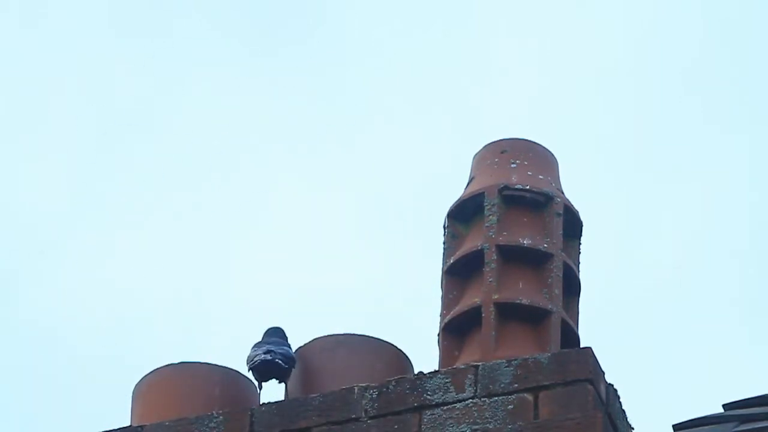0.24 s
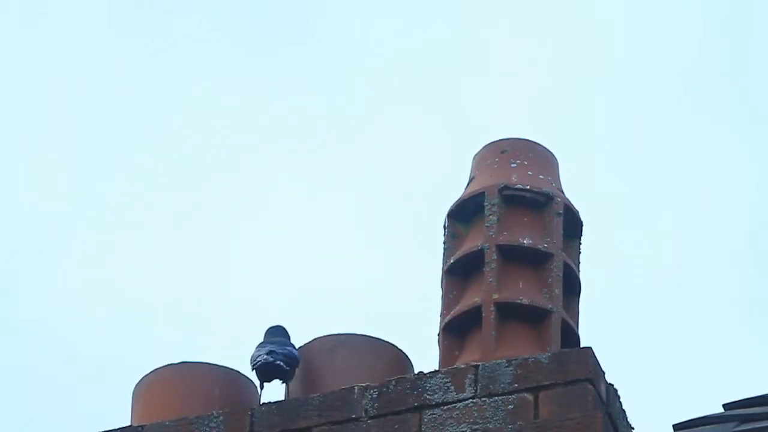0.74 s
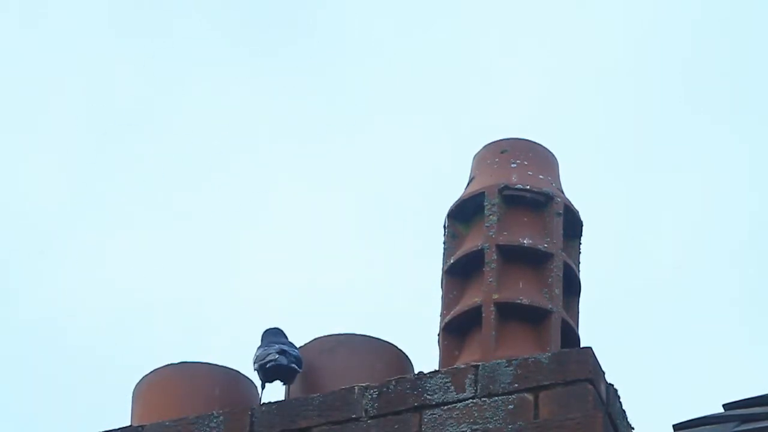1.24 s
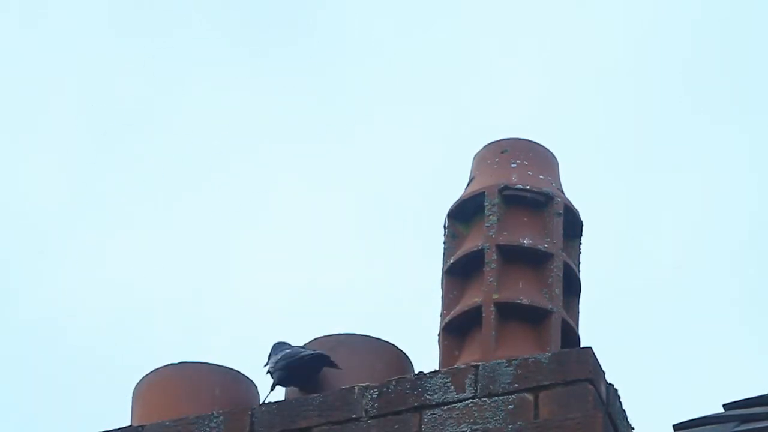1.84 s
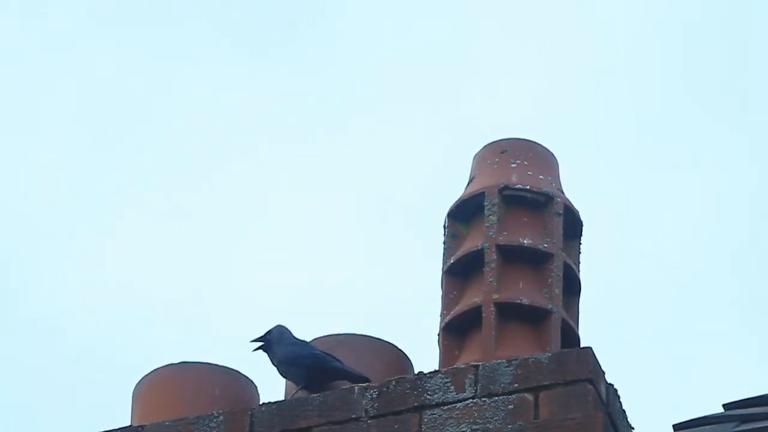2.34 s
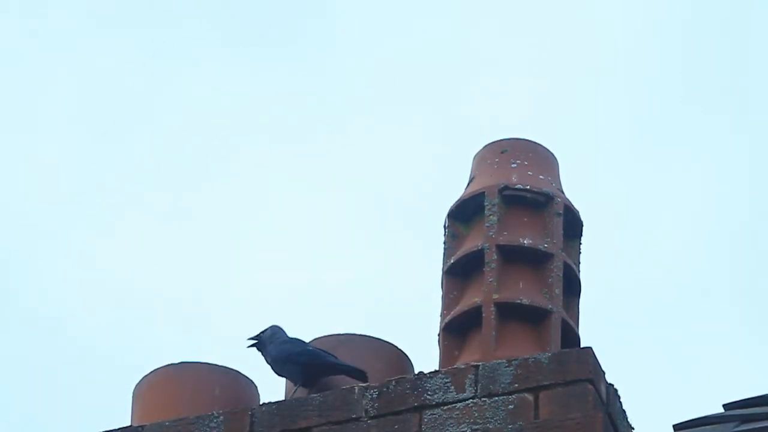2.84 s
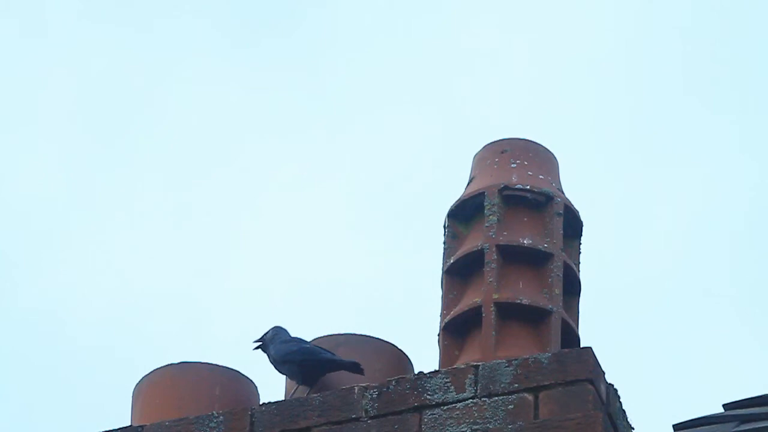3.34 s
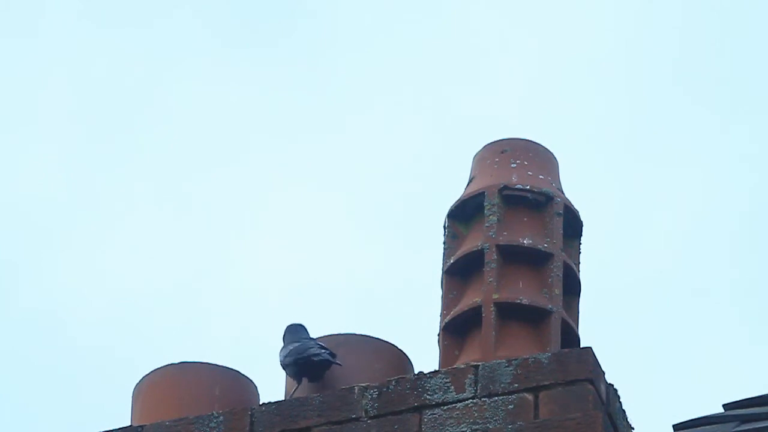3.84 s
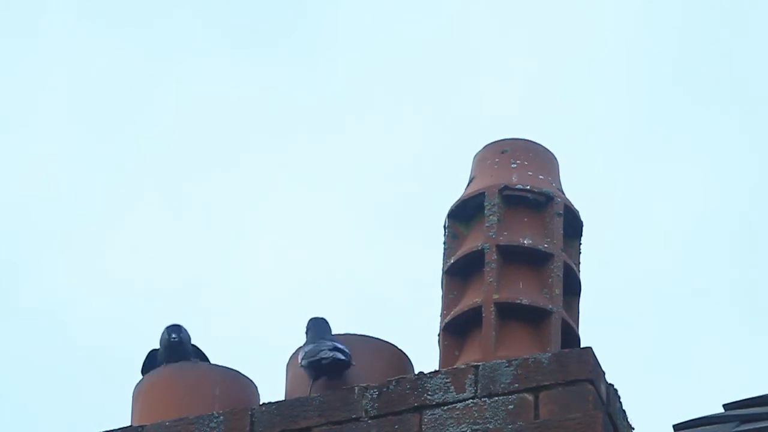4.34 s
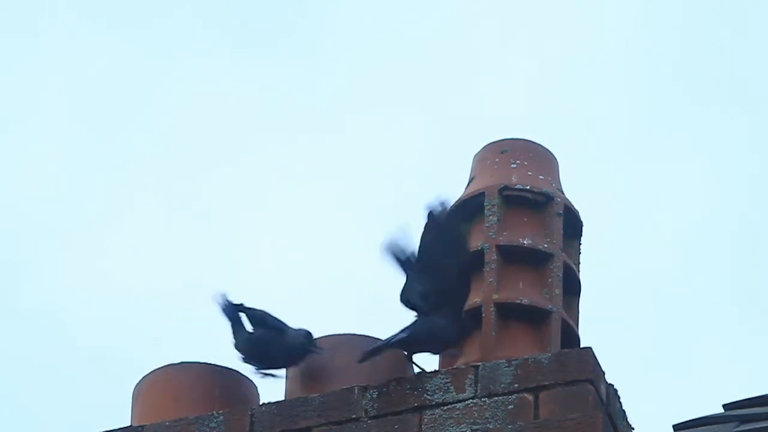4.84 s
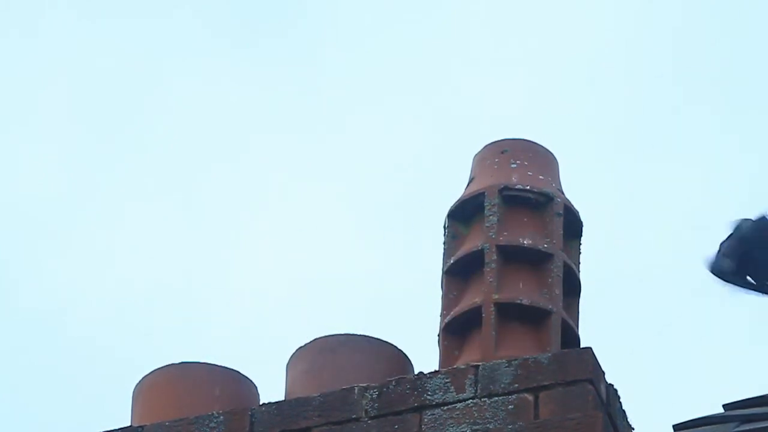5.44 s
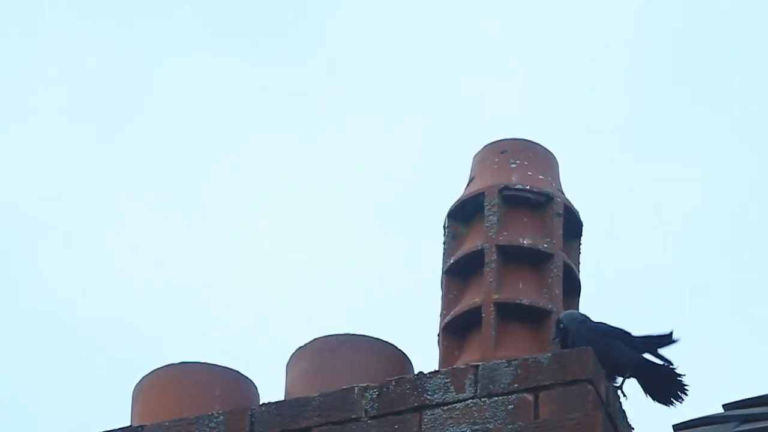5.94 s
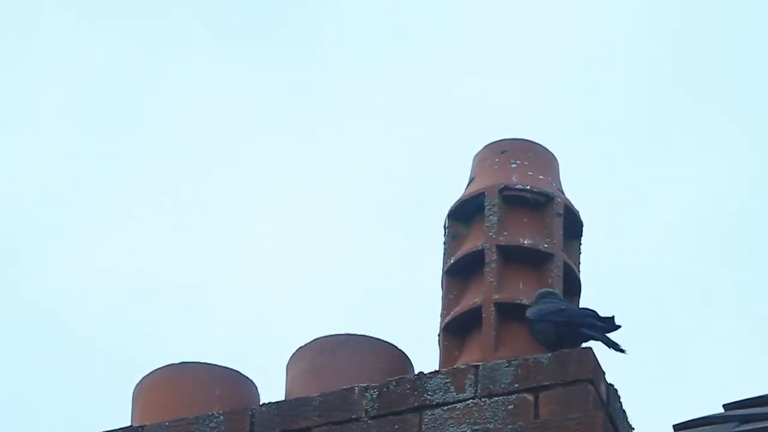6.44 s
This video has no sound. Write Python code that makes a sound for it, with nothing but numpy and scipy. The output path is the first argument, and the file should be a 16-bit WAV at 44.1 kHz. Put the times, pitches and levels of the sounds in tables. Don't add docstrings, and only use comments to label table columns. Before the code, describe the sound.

A rooftop outdoors, with low, steady town hum throughout. From the start a distant jackdaw colony chatters, whistles and rasps, and an arched, rough call sounds at 0.15 s. A sharp clear cry breaking into a harsh falling tail comes at 0.6 s, a dull low thump at 0.83 s amid overlapping hoarse voices, another arched call at 1.0 s and a loud longer cry at 1.4 s. The colony fades by 2 s. Single calls follow at 2.75 s and around 3.0 to 3.25 s, with weaker ones near 3.6 s, each with a short diffuse wall echo. A very faint motor passes around 4 s. The loudest cry is at 4.45 s, then faint small-bird churrs. Wings stir at 4.9 s, clap rapidly and crisply from 5.1 to 5.35 s, beat again near 5.6 s and flutter softly to 6 s beside a thin faint pipe. A duller call comes at 6.5 s.

```python
import sys
import numpy as np
from scipy import signal
from scipy.fft import rfft, irfft
from scipy.io import wavfile
from scipy.ndimage import uniform_filter1d

SR = 44100
rng = np.random.default_rng(int(sys.argv[2]) if len(sys.argv) > 2 else 0)


def attenuation_scalar(level_db):
    decades = np.asarray(level_db, float) / 20
    return 10 ** decades


def transcribe(signal):
    frames = np.atleast_2d(signal).T
    limited = np.clip(frames, -1, 1)
    pcm = np.round(limited * 32767).astype(np.int16)
    wavfile.write(sys.argv[1], SR, pcm)


N = 294588

# (time [s], level [dB])
COLONY_LEVEL = [
    (0, -40),
    (.4, -46),
    (1, -43.5),
    (1.4, -46),
    (1.7, -56.5),
    (2.1, -67),
    (6.68, -62.5),
]
RASP_SHARE = .1


def rms_one(x):
    return x / np.sqrt(np.mean(x ** 2) + 1e-20)


def at_hz(points, hz):
    points = np.array(points)
    return np.interp(np.log(hz), np.log(points[:, 0]), points[:, 1])


def in_time(rows):
    s, level_db = np.transpose(rows)
    return np.interp(np.arange(N) / SR, s, level_db, left=-120, right=-120)


def wobble(size, hz):
    knots = rng.standard_normal(size // 8 + 2)
    places = np.arange(size) * min(2 * hz / SR, 1 / 8)
    return np.interp(places, np.arange(len(knots)), knots) * 1.22


def coloured(x, spectrum):
    hz = np.maximum(np.fft.rfftfreq(x.shape[-1], 1 / SR), 1)
    return irfft(rfft(x) * attenuation_scalar(at_hz(spectrum, hz)), x.shape[-1])


def add(out, s, piece):
    i = int(s * SR)
    out[i:i + len(piece)] += piece[:N - i]


def glide(length, places, pitches_hz):
    size = 2 * int(length * SR / 2)
    path = np.interp(np.arange(size) / size, places, pitches_hz)
    return uniform_filter1d(path, size // 6, mode="nearest")


def note(hz, throat, rough, rise, fall, upper_db=0, swell_db=0, half_db=0, dull_db=0, closing=0):
    size = len(hz)
    t, part = np.arange(size) / SR, np.arange(size) / size
    shake = np.clip(rough * (.3 + 1.2 * part), 0, .6)
    hz = hz * (1 + 0.0887 * shake * wobble(size, hz=260.2))
    phase = 2 * np.pi * np.cumsum(hz) / SR
    k = np.arange(1, 36)[:, None]
    partial_hz = k * hz
    upper = upper_db * np.exp(-(np.log(partial_hz / 5300) / 0.22) ** 2)
    halves = half_db * (k % 2) * np.clip(1 - 1.85 * part, 0, 1)
    patches = 11 * shake * np.array([wobble(size, hz=60) for _ in k])
    muffling = dull_db * np.clip(np.log2(partial_hz / 5600), 0, 1)
    resonance = at_hz(throat, partial_hz * (1 + closing * part))
    weights = attenuation_scalar(resonance + upper + halves + patches - muffling) * (partial_hz < 16000)
    tone = (weights * np.cos(k * phase + rng.uniform(0, 3.6, k.shape))).sum(axis=0)
    tone = tone / np.sqrt((weights ** 2).sum(axis=0) / 2)
    gate = (.5 + .5 * np.cos(phase)) ** 0.33
    breath = rms_one(coloured(gate * rng.standard_normal(size), throat))
    uneven = attenuation_scalar(5.72 * shake * wobble(size, hz=188.3))
    edges = np.clip(t / rise, 0, 1) * np.clip((size / SR - t) / fall, 0, 1)
    shape = edges * attenuation_scalar(swell_db * part)
    return shape * uneven * (np.sqrt(1 - shake) * tone + np.sqrt(shake) * breath)


def strand(length, first_hz, last_hz, hoarse_hz):
    size = int(length * SR)
    phase = 2 * np.pi * np.cumsum(np.linspace(first_hz, last_hz, size)) / SR
    steady = 60.0 / hoarse_hz
    flutter = attenuation_scalar(min(hoarse_hz / 20, 2.5) * wobble(size, hz=43.6))
    in_phase = (steady + wobble(size, hoarse_hz)) * np.sin(phase)
    quadrature = wobble(size, hoarse_hz) * np.cos(phase)
    return rms_one(flutter * (in_phase + quadrature))


def town():
    # (frequency [Hz], density [dB per Hz])
    traffic = [(15, -66), (25, -13.5), (75, -14), (113, -11.5), (173, -10.5), (340, -4), (389, -4.5),
               (722, -10), (1660, -12.5), (2010, -19), (6210, -25), (7100, -25.5), (15500, -30)]
    # (frequency [Hz], bandwidth [Hz], level [dB])
    drones = [(110.4, 19, -67.5)]
    noise = rng.standard_normal((2, N))
    side = coloured(noise[1], [(60, -10), (300, -13), (2000, -12), (14000, -9)])
    stereo = coloured(noise[0] + side * [[1], [-1]], traffic)
    out = attenuation_scalar(-51 + wobble(N, hz=2.17) / 2) * rms_one(stereo)
    for hz, width_hz, level_db in drones:
        phase = 2 * np.pi * hz * np.arange(N) / SR
        in_phase = wobble(N, width_hz / 2) * np.sin(phase)
        out = out + attenuation_scalar(level_db) * (in_phase + wobble(N, width_hz / 2) * np.cos(phase))
    return out


def murmur():
    spectrum = [(500, -21), (1300, -9.5), (2300, -0.5), (3500, -17.5), (4500, -13.0), (5600, -14), (9000, -26.5)]
    voices = rms_one(coloured(rng.standard_normal(N), spectrum))
    return attenuation_scalar(in_time(COLONY_LEVEL) - 1.5 + 4.2 * wobble(N, hz=7.7)) * voices


def heads():
    # (time [s], length [s], first pitch [Hz], last pitch [Hz], level [dB])
    calls = [(0.038, 0.032, 1314, 1040, -33.5), (0.619, 0.033, 1390, 1273, -22.5),
             (0.845, 0.036, 1270, 1100, -31.5), (1.236, 0.0399, 1368, 1113, -34),
             (1.424, 0.0299, 1387, 1281, -19), (2.757, 0.029, 1394, 1288, -21.5),
             (3.032, 0.036, 1430, 1043, -34), (3.57, 0.0517, 1247, 948, -38.5),
             (3.719, 0.023, 1305, 1206, -34), (4.456, 0.027, 1387, 1286, -16.5),
             (6.488, 0.02, 1295, 1487, -24.5), (6.663, 0.027, 1085, 1060, -40.5)]
    # (frequency [Hz], level [dB])
    throat = [(500, -21), (1300, -9), (2700, 2), (4000, -19.5), (5400, -15), (6800, -16), (10000, -12.5),
              (15000, -17)]
    notes = []
    for s, length, first_hz, last_hz, level_db in calls:
        far_db, sag = max(-29.5 - level_db, 0), 1 - last_hz / first_hz
        gape_db = np.clip(133.5 * (sag - 0.082), -5, 13.5)
        hz = glide(length, [0, .2, 1], [1.1 * first_hz, .85 * first_hz + .15 * last_hz, last_hz])
        piece = note(hz, throat, rough=.025 * (0.5 + 0.8 * far_db),
                     rise=0.0097 - 0.015 * max(sag - .1, 0), fall=0.0015 + 0.0021 * far_db,
                     upper_db=gape_db, swell_db=5.5 - 36.5 * abs(sag),
                     dull_db=15 + far_db + 10 * (sag < 0))
        notes.append((s, level_db, -8, piece))
    return notes


def rasps():
    # (time [s], length [s], pitch [Hz], level [dB])
    calls = [(0.049, 0.084, 5090, -48), (.42, 0.12, 2540, -47), (0.501, 0.108, 3395, -43.5),
             (0.933, 0.16, 3186, -37.5), (1.083, 0.071, 3320, -33), (1.255, 0.077, 3486, -44),
             (1.354, 0.06, 3490, -40.5), (1.775, 0.18, 2600, -55), (2.312, .063, 4470, -61),
             (3.071, 0.1206, 1880, -42), (4.30, 0.33, 7050, -62), (4.312, 0.064, 3130, -60.5)]
    return [(s, length, hz, hz, level_db, RASP_SHARE * hz) for s, length, hz, level_db in calls]


def slurs():
    # (time [s], length [s], first pitch [Hz], last pitch [Hz], level [dB])
    calls = [
        (0.097, 0.052, 1075, 925, -53),
        (0.387, 0.086, 1297, 993, -43),
        (0.449, 0.134, 1930, 1565, -43),
        (0.853, .12, 1500, 1303, -48.5),
        (0.901, 0.14, 2080, 1627, -44.5),
        (4.443, 0.015, 1550, 1270, -51),
    ]
    # (frequency [Hz], level [dB])
    throat = [(1000, -7), (1700, -1.5), (2300, 1.5), (3500, -6), (5000, -8.5), (8000, -33.5)]
    rows = []
    for s, length, first_hz, last_hz, level_db in calls:
        for k in range(1, 5):
            throat_db = at_hz(throat, k * (first_hz + last_hz) / 2)
            rows.append((s, length, k * first_hz, k * last_hz, level_db + throat_db, k * 40))
    return rows


def arches():
    # (time [s], top pitch [Hz], last pitch [Hz], level [dB])
    calls = [
        (.157, 641.6, 415.3, -22.5),
        (0.994, 654, 443, -23),
        (3.231, 661.4, 393.7, -27),
    ]
    # (frequency [Hz], level [dB])
    throat = [(500, -28), (1250, -11), (1800, -5.5), (2500, 6), (3100, -11.5), (4000, -24), (5600, -7.5),
              (7500, -19), (11000, -20.5), (15000, -18.5)]
    notes = []
    for s, top_hz, last_hz, level_db in calls:
        hz = glide(.078, [0, .2, .4, 1], [.89 * top_hz, top_hz, .94 * top_hz, last_hz])
        piece = note(hz, throat, rough=.10, rise=.010, fall=0.014, swell_db=-3.0, half_db=-14.5)
        notes.append((s, level_db, .1, piece))
    return notes


def whistles():
    # (time [s], length [s], first pitch [Hz], last pitch
    # [Hz], level [dB])
    glides = [(0.302, 0.11, 2310, 2294, -39.5), (0.446, 0.074, 1960, 2400, -35),
              (0.505, 0.0258, 2321, 2399, -28.5), (0.534, 0.079, 2420, 2400, -38.5),
              (0.765, 0.097, 2960, 2950, -41), (0.807, 0.13, 2350, 2286, -38.5),
              (0.901, 0.1057, 2300, 2324, -32.5), (1.179, .12, 2050, 2350, -41),
              (1.618, 0.045, 3750, 3460, -47.5), (1.709, 0.0316, 2700, 2824, -48.5),
              (1.966, 0.064, 2250, 2208, -57), (2.71, 0.097, 4900, 4350, -56),
              (3.084, 0.064, 4750, 4720, -50.5), (3.746, 0.05, 1764, 1370, -38.5),
              (.235, .04, 4930, 3500, -51.5), (.86, .04, 2373, 1938, -39), (4.404, 0.0495, 7300, 6630, -56),
              (5.86, 0.052, 5000, 5100, -53), (6.14, 0.083, 4150, 4100, -60)]
    # (time [s], length [s], level [dB])
    piping = [
        (5.70, .2, -55),
        (5.79, .11, -54),
        (5.90, .30, -60),
    ]
    rows = [(*row, 28) for row in glides]
    return rows + [(s, length, 2022, 2022, level_db, 8) for s, length, level_db in piping]


def chance_calls():
    colony_db = in_time(COLONY_LEVEL)
    rows = []
    for when, long, fall, height in rng.random((44, 4)):
        s, hz = .25 + 1.45 * when, 1300 * 2.8 ** height
        level_db = colony_db[int(s * SR)] - 3
        rows.append((s, .04 + .09 * long, hz, hz * (.95 - .2 * fall), level_db, 60))
    return rows


def churrs():
    # (time [s], length [s], level [dB])
    calls = [
        (0.286, .14, -50),
        (4.636, 0.148, -54),
        (4.817, 0.14, -49.5),
    ]
    # (frequency [Hz], level [dB])
    partials = [(5804, -2.5), (5310, -0.5), (4380, -16.5), (3774, -11.5), (3000, -13)]
    return [(s, length, 1.01 * hz, .99 * hz, level_db + partial_db, 190)
            for s, length, level_db in calls for hz, partial_db in partials]


def engine():
    # time [s], length [s], first frequency [Hz], last frequency [Hz], level [dB]
    motor = (3.72, 0.51, 156, 180, -60.5)
    return [(*motor, 4)]


def yard():
    # (frequency [Hz], level [dB])
    bands = [(1640, -48), (2520, -53.5), (4950, -55.5)]
    start_s, t60_s = 3.78, 1.35
    out, t = np.zeros(N), np.arange(SR // 2) / SR
    for hz, level_db in bands:
        decay = attenuation_scalar(level_db - 60 * t / t60_s) * np.clip(t / 0.027, 0, 1)
        add(out, start_s, decay * strand(.5, hz, hz, RASP_SHARE * hz))
    return out


def far_sources():
    out = murmur() + yard()
    partials = rasps() + slurs() + whistles() + chance_calls() + churrs() + engine()
    for s, length, first_hz, last_hz, level_db, hoarse_hz in partials:
        tone = strand(length, first_hz, last_hz, hoarse_hz)
        add(out, s, attenuation_scalar(level_db) * tone * np.sqrt(np.hanning(len(tone))))
    return out


def tails():
    # (time [s], length [s], last pitch [Hz], level [dB])
    calls = [
        (0.651, 0.064, 442.6, -21),
        (0.878, 0.0321, 600, -36),
        (1.262, 0.044, 444.3, -38),
        (1.454, 0.071, 540, -20.5),
        (2.784, 0.071, 394.4, -21),
        (3.055, 0.0495, 600, -36.5),
        (3.732, 0.058, 625, -41.5),
        (4.482, 0.069, 464, -20.5),
        (6.502, 0.092, 480, -27.5),
    ]
    # (frequency [Hz], level [dB])
    throat = [(400, -45), (950, -13), (1480, -6), (2700, 4.5), (4000, -16), (5700, -7.5), (7500, -13),
              (11000, -20.5), (15000, -20)]
    first_hz, full_s = 999.4, .065
    notes = []
    for s, length, last_hz, level_db in calls:
        plunge = glide(length, [0, .013 / length, .034 / length, 1], [0.935, .84, .27, 0.0093])
        hz = last_hz + (first_hz - last_hz) * plunge
        rough = 0.314 + 20 * max(full_s - length, 0)
        dull_db = 280 * max(length - full_s, 0)
        piece = note(hz, throat, rough, rise=0.0054, fall=0.033, swell_db=-4.5, dull_db=dull_db, closing=0.18)
        notes.append((s, level_db, 1.5, piece))
    return notes


def jackdaws():
    direct, to_walls = np.zeros((2, N))
    for s, level_db, send_db, piece in heads() + arches() + tails():
        far_send_db = 0.549 * max(-18.5 - level_db, 0)
        add(direct, s, attenuation_scalar(level_db) * piece)
        add(to_walls, s, attenuation_scalar(level_db + send_db + far_send_db) * piece)
    return direct, to_walls


def walls(x):
    # (frequency [Hz], decay time t60 [s], level [dB])
    bands = [(600, 0.26, -19), (1100, 0.5, -10.5), (1489, 0.35, -3.5), (2150, 0.47, -4.5), (3230, 0.46, -7),
             (4380, 0.38, -9.5), (6030, 0.39, -7.5), (8600, 0.32, -9)]
    t = np.arange(SR) / SR
    mid, side = rng.standard_normal((2, SR))
    scatter = mid + .25 * side * [[1], [-1]]
    answer = 0
    for hz, t60, level_db in bands:
        sos = signal.butter(2, [hz / 1.333, hz * 1.23], "band", fs=SR, output="sos")
        decay = attenuation_scalar(-60 * t / t60) * np.clip((t - .006) / 0.0052, 0, 1)
        gain = attenuation_scalar(level_db) / np.sqrt(np.sum(decay ** 2))
        answer = answer + gain * signal.sosfilt(sos, scatter) * decay
    return signal.fftconvolve(x[None], answer, axes=1)[:, :N]


def thump():
    # (time [s], frequency [Hz], level [dB], decay time t60 [s])
    modes = [
        (0.828, 108, -46, 0.37),
        (.829, 240, -36, 0.037),
        (0.851, 488.2, -38, 0.194),
    ]
    out, t = np.zeros(N), np.arange(SR // 4) / SR
    for s, hz, level_db, t60 in modes:
        decay = attenuation_scalar(level_db - 60 * t / t60) * np.clip(t / 0.0023, 0, 1)
        add(out, s, decay * np.sin(2 * np.pi * hz * t))
    return out


def wings():
    # (time [s], peak [dB], low band against the peak [dB])
    claps = [(5.01, -38, -19), (5.116, -25, -15), (5.1445, -26.5, -18), (5.1615, -23, -4.5),
             (5.167, -23.5, -13), (5.27, -22.5, -18), (5.2834, -44, -4), (5.332, -34, -8.5),
             (5.3509, -36, -6), (5.4999, -38, -14), (5.6261, -27, -15)]
    # (time [s], peak [dB], width [s])
    strokes = [(2.325, -45, 0.019), (4.86, -38, 0.0192), (4.895, -38, 0.0147), (4.97, -44.5, 0.0074),
               (5.07, -39, 0.0066), (5.18, -50.5, 0.0097), (5.38, -43, 0.0092), (5.46, -43, .008),
               (5.54, -50.5, .008), (5.59, -43.5, 0.021), (5.70, -50, 0.021), (5.75, -48.5, 0.013),
               (5.90, -38.5, 0.0214), (5.964, -39.5, 0.0126)]
    # (time [s], level [dB])
    rustle = [
        (4.75, -75),
        (4.93, -63.5),
        (5.242, -49.5),
        (5.592, -59.5),
        (5.708, -62.5),
        (6.1, -73),
    ]
    bright, low = np.zeros((2, N))
    t = np.arange(SR // 16) / SR
    beats = [(*clap, .0025) for clap in claps]
    beats += [(s, peak_db, -11.5, width) for s, peak_db, width in strokes]
    for s, peak_db, low_db, width in beats:
        bell = np.exp(-((t - 1.22 * width) / width) ** 2)
        burst = bell + 0.29 * np.clip(t / width - 1, 0, 1) * np.exp(-t / 0.036)
        add(bright, s - width, attenuation_scalar(peak_db - 12.0) * burst)
        add(low, s - 0.78 * width, attenuation_scalar(peak_db + low_db - 8) * burst)
    bright = bright + attenuation_scalar(in_time(rustle) - 1.5 + 3.0 * wobble(N, hz=45))
    air = rng.standard_normal((3, N))
    hiss = coloured(air[0] + .35 * air[1] * [[1], [-1]],
                    [(3000, -5.5), (7000, -5), (11500, 1.0), (14500, -1.0), (16000, -1.0)])
    slap = coloured(air[2], [(150, -5), (400, 2.5), (1200, -8), (2000, -8.0), (4500, -2), (7000, -13), (10000, -20)])
    return bright * rms_one(hiss) + low * rms_one(slap)


def scene():
    near, to_walls = jackdaws()
    far = far_sources()
    direct = (near + far) * attenuation_scalar(np.array([[-.25], [.25]]))
    early = .2 * np.gradient(near) * [[1], [-1]]
    return direct + early + walls(to_walls + attenuation_scalar(0.5) * far) + wings() + thump() + town()


def narrowed(x):
    mid, side = (x[0] + x[1]) / 2, (x[0] - x[1]) / 2
    frames = signal.stft([mid, side], nperseg=2048)[2]
    mid_power, side_power = np.abs(frames) ** 2
    treble_weight = np.linspace(.5, 60, 1025)[:, None]
    loud_db = 10 * np.log10((mid_power * treble_weight).sum(axis=0) + 1e-14)
    band_db = 10 * np.log10(uniform_filter1d(side_power, size=16, axis=0) + 1e-14)
    kept = np.clip(np.maximum(loud_db + 29, band_db + 76) / 2, 0, 1)
    side = signal.istft(frames[1] * kept, nperseg=2048)[1][:N]
    return np.array([mid + side, mid - side])


def top_cut(x):
    return signal.sosfilt(signal.butter(12, 15740, fs=SR, output="sos"), x)


def record(dry):
    cut = signal.sosfilt(signal.cheby2(12, 60, 16000, fs=SR, output="sos"), dry)
    voice = signal.sosfilt(signal.butter(2, [1000, 4000], "band", fs=SR, output="sos"), cut[0])
    level_db = 10 * np.log10(uniform_filter1d(voice ** 2, 1500) + 1e-12)
    body = signal.sosfiltfilt(signal.butter(8, 13200, fs=SR, output="sos"), cut)
    kept = body + (cut - body) * attenuation_scalar(-4.0 * np.clip(level_db + 45.0, 0, 12))
    return top_cut(narrowed(kept))


dry = scene()
out = record(dry)
transcribe(out)
```